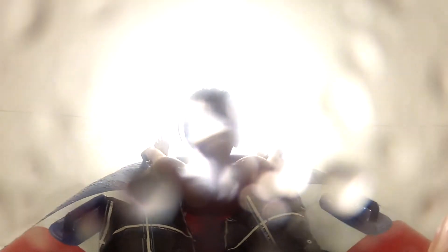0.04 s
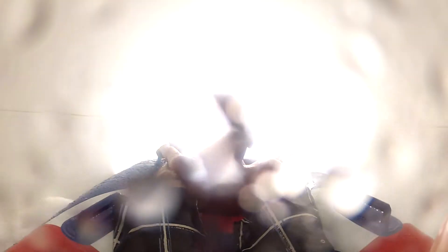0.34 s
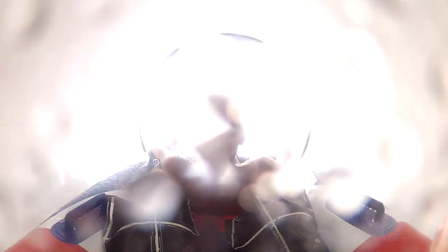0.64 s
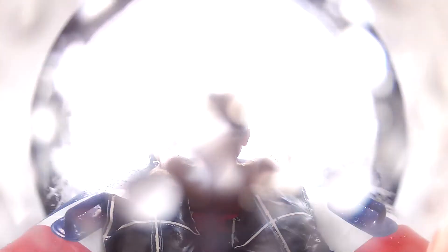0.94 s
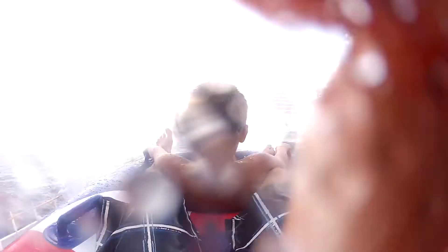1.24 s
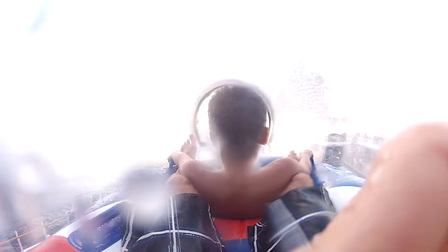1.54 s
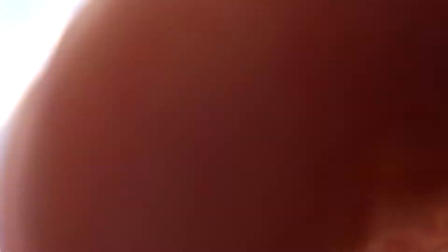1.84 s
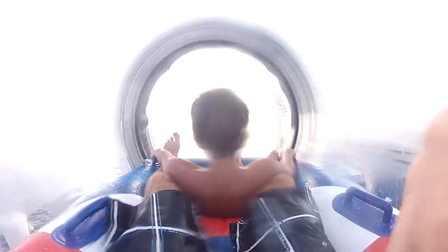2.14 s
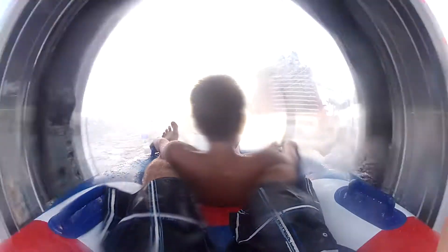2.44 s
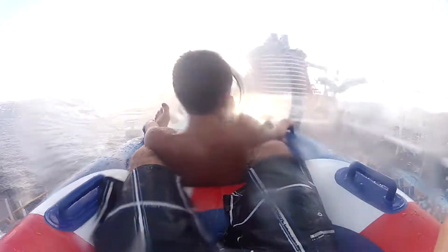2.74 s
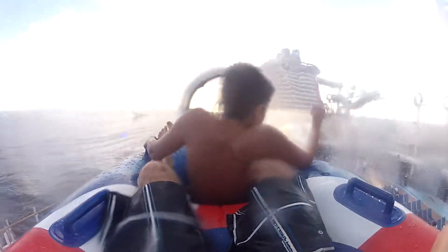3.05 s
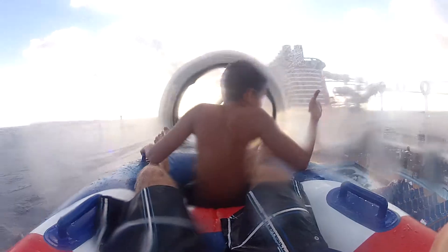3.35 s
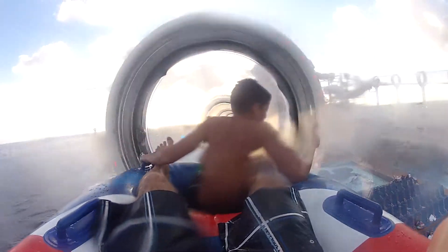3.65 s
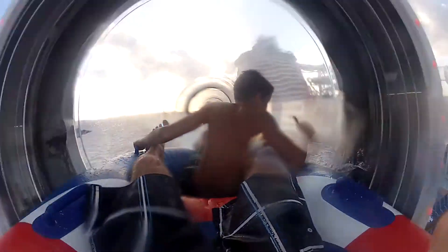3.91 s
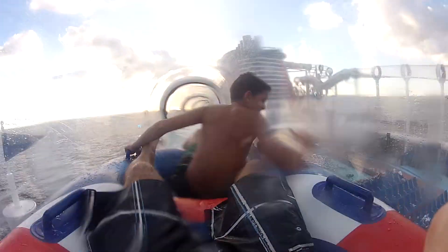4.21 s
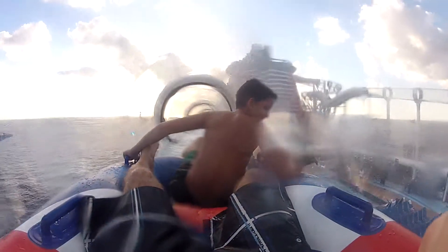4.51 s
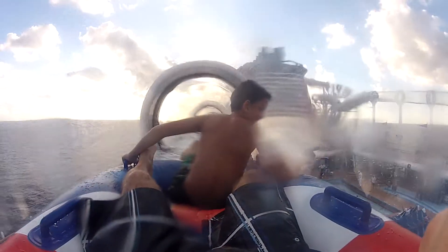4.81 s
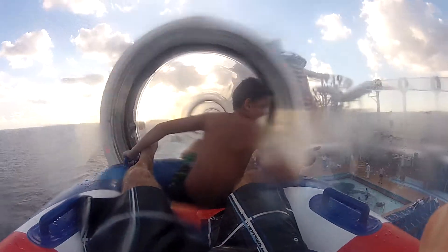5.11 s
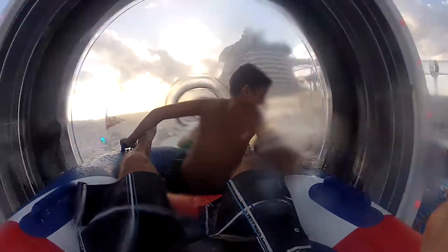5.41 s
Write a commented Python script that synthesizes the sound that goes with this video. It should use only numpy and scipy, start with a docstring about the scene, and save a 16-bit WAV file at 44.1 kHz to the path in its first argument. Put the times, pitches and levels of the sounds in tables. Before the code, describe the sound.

An inflatable raft rides down a water slide tube, heard from inside a sealed waterproof case. From the start, water rushes with a narrow, ringing hiss above a dull slosh and a low raft rumble, all growing slightly louder, with a faint glassy fizz on top throughout. From about 1 second, a hand grips and bumps the plastic case, making a quick, irregular run of close knocks, deep thumps and short rubs. The loudest hits land at about 1.6 and 2 seconds, well above the water, and lighter ones trail off by 2.8 seconds. From about 2.5 seconds the raft jolts on the tube floor, most clearly near 2.9 seconds, and brief gushes of spray hit the case. One last light knock comes at 4.3 seconds amid more spray and a soft swell of rumble. The rush continues to the end, with another spurt near 5.6 seconds.

```python
"""A raft rides down a water slide tube, heard from a camera in a sealed waterproof case.
From the start, water rushes through the case's narrow resonances and the raft rumbles underneath,
both slowly growing. From 1 s to 2.8 s the case is gripped, rubbed and bumped in a quick run of knocks.
From about 2.5 s come jolts of the raft and gushes of spray, with one last knock at 4.3 s.
Throughout, the camera's coarse sampling adds a glassy fizz."""
import sys
import numpy as np
from scipy import signal
from scipy.fft import rfft, irfft
from scipy.io import wavfile
from scipy.ndimage import uniform_filter1d

SR = 44100
rng = np.random.default_rng(int(sys.argv[2]) if len(sys.argv) > 2 else 0)


def wav_record(signal):
    """Record a signal, one row per channel, as 16-bit PCM in the file named by sys.argv[1]."""
    frames = np.transpose(np.atleast_2d(signal))
    bounded = np.clip(frames, -1, 1)
    # unit amplitude maps onto the largest positive 16-bit level
    quanta = np.round(bounded * 32767).astype(np.int16)
    wavfile.write(sys.argv[1], SR, quanta)


N = 250047
TIME = np.arange(N) / SR


# Hits on the case: (time [s], thump level [dB], thump pitch [Hz], relative crack level [dB],
# crack decay [ms], tone favoured by the struck spot [Hz])
CASE_HITS = [ (1.0385, -10, 140, -22, 4.4, 380), (1.0792, -30, 200, -27, 1.5, 1200),
             (1.103, -18, 210, -21, 2.4, 1350), (1.147, -9, 171, -11, 2, 1070),
             (1.152, -19.5, 270, -9, 2.0, 2300), (1.3097, -19, 85, -20, 1.3, 2450),
             (1.3171, -19, 151, -25, 2, 450), (1.3294, -15, 109, -22.5, 3.5, 400),
             (1.3770, -18, 182, -32, 4.8, 400), (1.5478, -12.5, 170, -10.5, 0.82, 1400),
             (1.5530, 0, 119.5, -4, 1.2, 930), (1.5550, -10, 313, -16, 6.7, 400),
             (1.5994, -19, 120, -15.5, 2.6, 440), (1.772, -8.5, 73, -18, 4.3, 400),
             (1.9422, -13, 162, -19, 2.2, 453), (2.0161, 4.5, 135.3, -12, 4.9, 1820),
             (2.195, -25.5, 92.5, -26, 1.6, 690), (2.3417, -18, 72, -19, 1.8, 1040),
             (2.3934, -26.5, 131, -19.5, 1.07, 2240), (2.7690, -22.5, 146, -25, 2.4, 400),
             (4.2715, -22.5, 118, -24, 1.44, 860)]

def knocks():
    """Each blow squeezes the air in the case (softer contact, lower thump) and makes the shell crack."""
    out, t = np.zeros(N), TIME[:SR // 10]
    for start, thump_db, thump_hz, crack_db, decay_ms, spot_hz in CASE_HITS:
        decay = decay_ms / 1000
        contact = .28 * rng.standard_normal(len(t)) * np.exp(-t / decay)  # the surfaces chatter
        contact[0] += 1.3  # sharp attack
        crack = case_ring(contact, spot_hz, focus_db=7.5)
        crack /= np.sqrt(np.sum(crack ** 2) / (SR * decay))
        add(out, start, undb(thump_db) * thump(t, thump_hz) + undb(crack_db - 2.5) * crack)
    return out


def thump(t, hz, swell_cycles=0.41):
    """Air squeezed in the case: a swing that swells and dies within about two cycles."""
    age = t * hz / swell_cycles
    return (age * np.exp(1 - age)) ** 2 * np.sin(2 * np.pi * hz * t)


# Resonances of the shell: (frequency [Hz], bandwidth [Hz], level [dB])
SHELL_MODES = [(350, 220, 3.5), (744, 256, 0.5), (1013, 200, -0.5), (1530, 186, -4.5), (1740, 450, -5),
               (2334, 570, -7), (3150, 620, -13.5)]

def case_ring(push, spot_hz=700, focus_db=0):
    """The plastic case rings in damped modes; the touched spot lifts those near spot_hz."""
    out = 0
    for k, (hz, width, db) in enumerate(SHELL_MODES):
        lift_db = focus_db * np.exp(-(2 * np.log(hz / spot_hz)) ** 2)
        ring = signal.lfilter(*signal.iirpeak(hz, hz / width, SR), push)
        out = out + (-1) ** k * undb(db + lift_db) * ring
    return out


# Strokes across the case: (peak time [s], half length [s], level [dB])
RUB_STROKES = [(1.125, 0.035, -35), (1.362, 0.086, -41), (1.436, 0.0094, -31), (1.547, 0.01, -28),
               (1.607, 0.021, -29), (1.97, 0.068, -40), (2.155, 0.019, -29.5), (2.212, 0.02, -38.5),
               (2.32, 0.074, -43), (2.79, .03, -42.5)]

def rubs():
    """Wet skin and raft slide on the case, ringing it with little slips over a fine scrape."""
    slips = grains(rate=440, spread_db=1.5) + undb(-3.5) * rng.standard_normal(N)
    return swells(RUB_STROKES) * unit(case_ring(slips))


# Soft presses that flex the case without a crack: (time [s], level [dB])
SOFT_PRESSES = [(1.286, -24), (1.437, -23), (1.585, -17), (1.684, -19), (2.122, -28)]

def hand(start_s=1.22, end_s=2.25, fade_s=0.16, grip_db=-38.5):
    """The case rumbles while a hand holds it, and each soft press gives a deep thump."""
    grip = np.clip(np.minimum(TIME - start_s, end_s - TIME) / fade_s + .5, 0, 1)
    out = grip * rumble() * undb(grip_db + 1.5 * walk(rate=13.3))
    for start, db in SOFT_PRESSES:
        add(out, start, undb(db) * thump(TIME[:SR // 10], hz=46))
    return out


# EQ of the rush through the case wall: (frequency [Hz], level [dB])
RUSH_EQ = [(1000, -27), (1450, -15), (1650, -16.5), (1850, -8), (2000, -1.5), (2110, 1.5), (2250, -3.5),
           (2450, -10), (2650, -15.5), (2830, -15.5), (3050, -18.5), (3420, -9.5), (3650, -17.5),
           (3950, -12)]
# Gushes of spray on the case: (peak time [s], half length [s], relative level [dB])
SPRAY_GUSHES = [(2.725, 0.003, -36), (2.96, 0.062, -53), (3.262, .01, -49), (4.220, 0.015, -40.5),
                (4.415, 0.037, -45), (5.597, 0.0066, -42), (5.63, 0.029, -55)]

def water_rush(flow_db):
    """Hiss and droplets surge together and ring the case wall."""
    spray = rng.standard_normal(N) + undb(-4.5) * grains(rate=900, spread_db=1.0)
    flutter_db = 0.93 * walk(rate=14) + 0.76 * walk(rate=70)
    surge = undb(-43 + flow_db + flutter_db) + swells(SPRAY_GUSHES)
    return undb(1.87) * colour(spray, RUSH_EQ) * surge


# EQ of the water in the tube: (frequency [Hz], level [dB])
WASH_EQ = [(50, -7), (110, 3.5), (180, 0), (310, 0.5), (480, -5), (680, -6), (880, -2), (1050, -5),
           (1250, -16.5), (1700, -11.5)]

def water_wash(flow_db):
    """Water sloshes along the tube, a dull bed below the rush."""
    slosh = rng.standard_normal(N) + undb(-9.5) * grains(rate=300, spread_db=5.0)
    return colour(slosh, WASH_EQ) * undb(-51.06 + flow_db + walk(rate=25))


# The raft rides harder on the floor: (peak time [s], half length [s], level [dB])
RAFT_JOLTS = [(2.65, 0.18, -48.5), (2.905, 0.028, -35.5), (4.35, 0.26, -51.5)]

def raft(flow_db):
    """The air-filled raft shudders over the tube floor."""
    return rumble() * (undb(-51 + flow_db + 1.8 * walk(rate=7.4)) + swells(RAFT_JOLTS))


# EQ of the low end from raft and hand: (frequency [Hz], level [dB])
RUMBLE_EQ = [(12, -9), (28, -0.5), (55, -2), (85, -11.5), (140, -19), (300, -29.5)]

def rumble():
    """Sub-heavy noise; rms 1."""
    return colour(rng.standard_normal(N), RUMBLE_EQ)


def undb(db):
    """Decibels to gain."""
    return 10 ** (np.asarray(db) / 20)


def unit(x):
    """Scale to rms 1."""
    return x / np.sqrt(np.mean(x ** 2))


def colour(x, eq):
    """Shape x with an EQ curve that rolls off beyond its ends; rms 1."""
    hz, db = np.transpose(eq)
    f = np.maximum(np.fft.rfftfreq(N, 1 / SR), 1)
    rolloff = np.minimum(f / hz[0], 1) ** 2 * np.minimum(hz[-1] / f, 1) ** 2
    curve = undb(np.interp(np.log(f), np.log(hz), db))
    return unit(irfft(rfft(x) * rolloff * curve, N))


def walk(rate):
    """Smooth random drift that changes about rate times a second; rms 1."""
    hold = max(int(SR / rate), 1)
    steps = np.repeat(rng.standard_normal(N // hold + 1), hold)
    return unit(uniform_filter1d(uniform_filter1d(steps, hold), hold)[:N])


def grains(rate, spread_db):
    """Random tiny impacts of unequal size, rate a second; rms 1."""
    size = undb(spread_db * np.minimum(rng.exponential(size=N), 4))
    return unit((rng.random(N) < rate / SR) * size * rng.choice([-1, 1], N))


def swells(rows):
    """An envelope with one smooth rise and fall per row."""
    return sum(undb(db) * np.exp(-((TIME - peak) / half) ** 2) for peak, half, db in rows)


def add(out, start_s, sound):
    """Mix a sound in at its cue."""
    i = int(start_s * SR)
    out[i:i + len(sound)] += sound[:N - i]


def scene(rise_db_per_s=0.26):
    """Handling over the ride; one flow lifts rush, wash and raft rumble as the raft gathers speed."""
    flow_db = rise_db_per_s * TIME + 0.49 * walk(rate=3.56)
    ride = water_rush(flow_db) + water_wash(flow_db) + raft(flow_db)
    return (ride + hand() + knocks() + rubs())[None]


def record(dry, sample_hz=8000, band_hz=3720, top_hz=15200):
    """The camera samples slowly, caps peaks and holds each sample, mirroring the sound into the treble."""
    anti_alias = signal.butter(12, band_hz, fs=SR, output="sos")
    dull = signal.sosfiltfilt(anti_alias, dry)
    coarse = signal.resample_poly(dull, sample_hz, SR, axis=1, window=("kaiser", 2))
    held = np.repeat(np.clip(coarse, -1, 1), 4, axis=1)
    fizzy = signal.resample_poly(held, SR, 4 * sample_hz, axis=1, window=("kaiser", 3))[:, :N]
    high_cut = signal.ellip(8, .2, 70, top_hz, fs=SR, output="sos")
    return signal.sosfilt(high_cut, fizzy)


dry = scene()
out = record(dry)
wav_record(out)
```